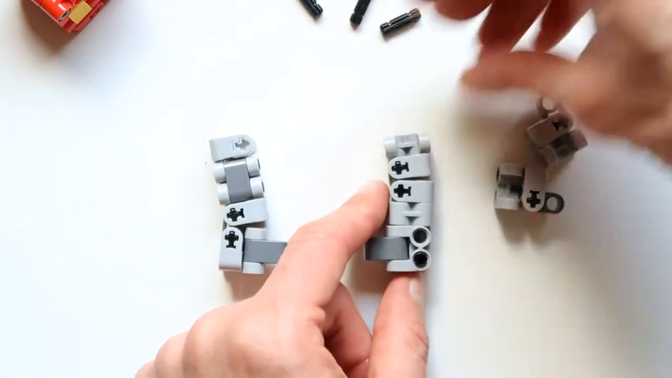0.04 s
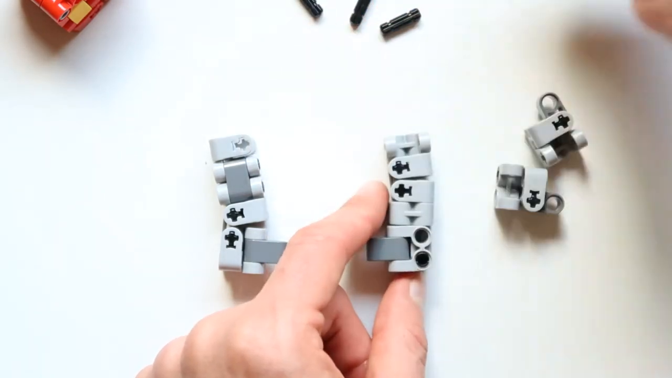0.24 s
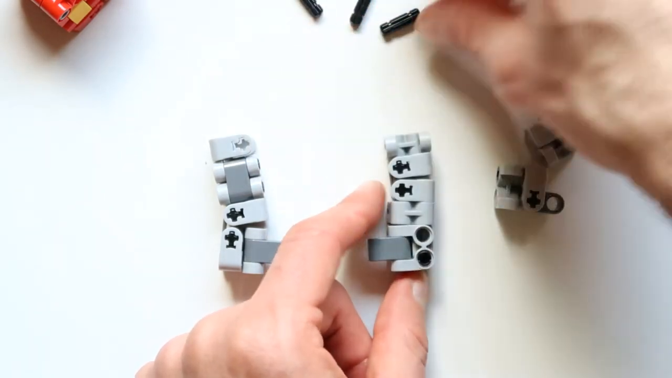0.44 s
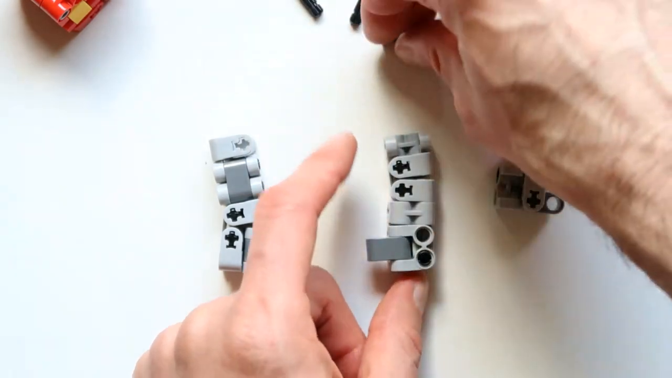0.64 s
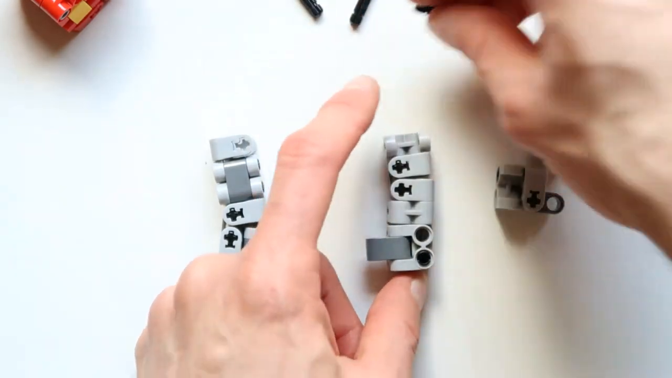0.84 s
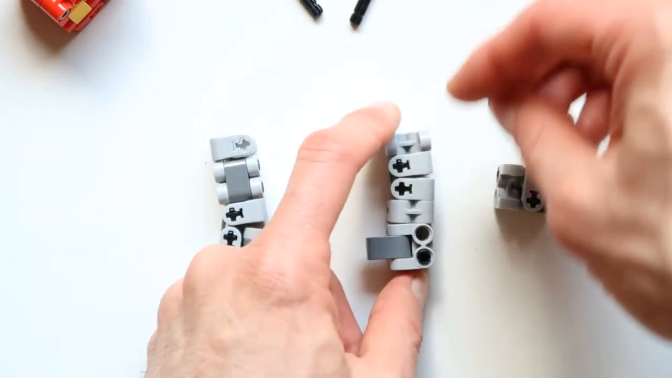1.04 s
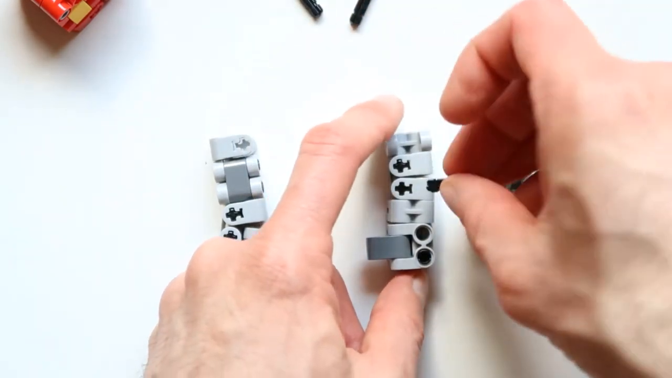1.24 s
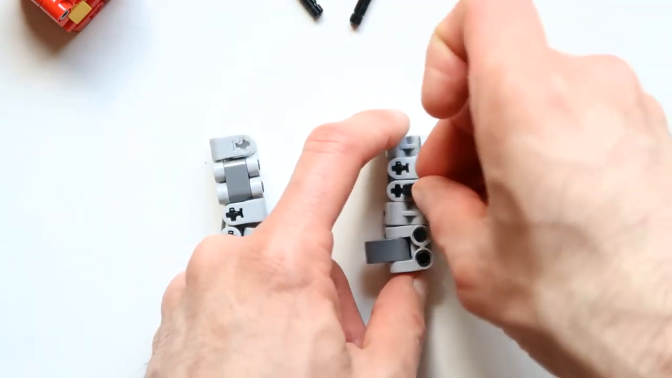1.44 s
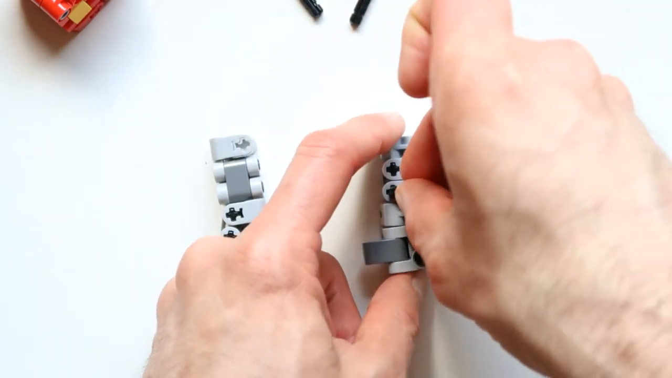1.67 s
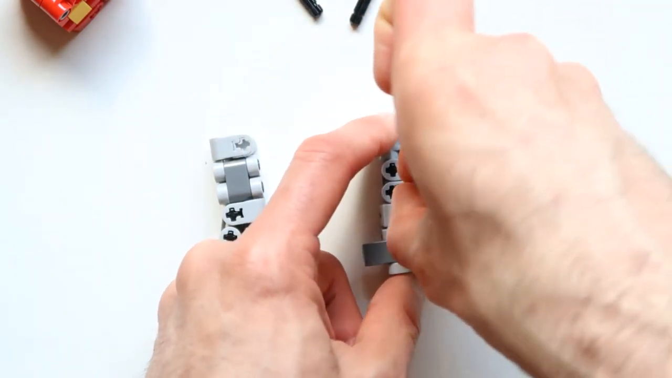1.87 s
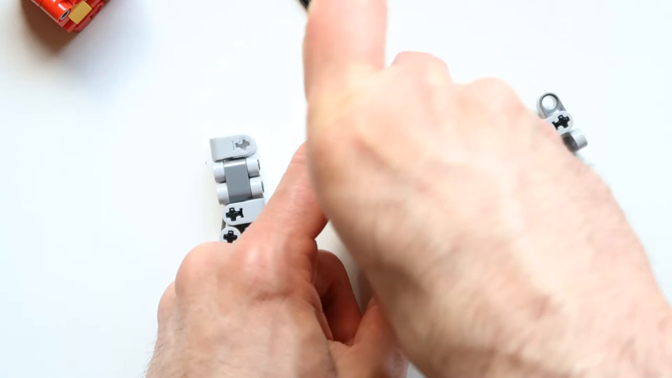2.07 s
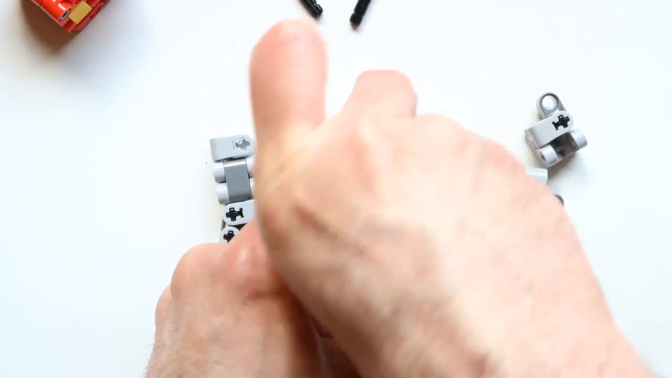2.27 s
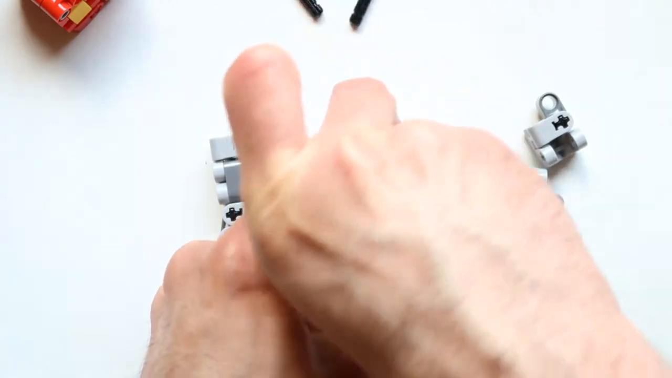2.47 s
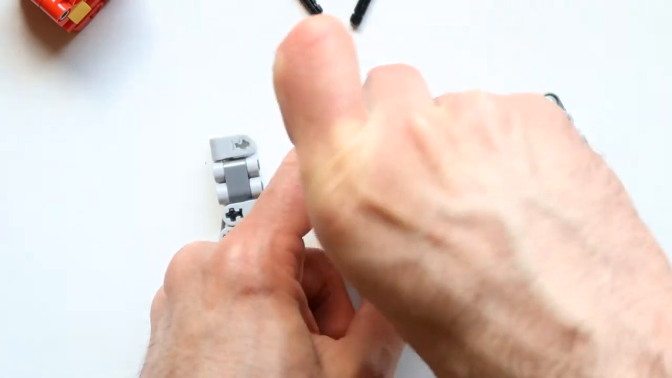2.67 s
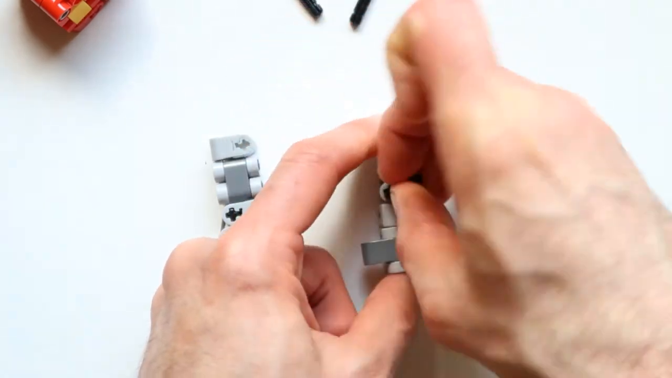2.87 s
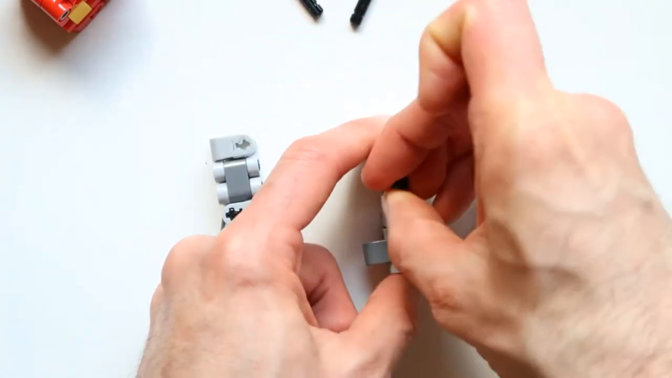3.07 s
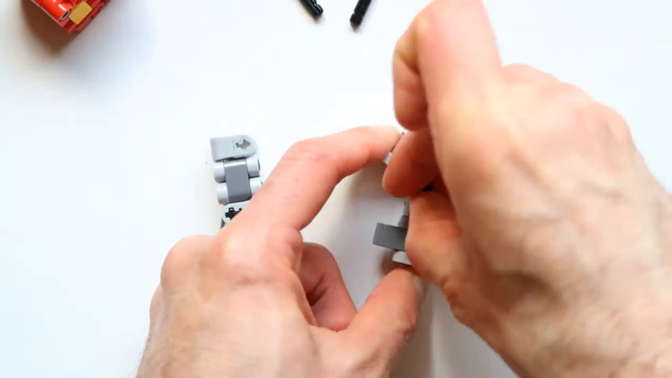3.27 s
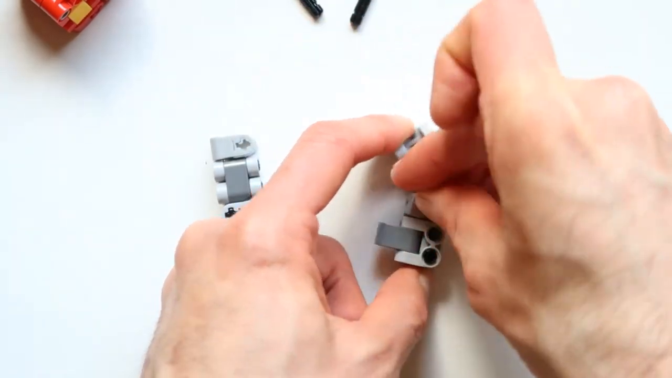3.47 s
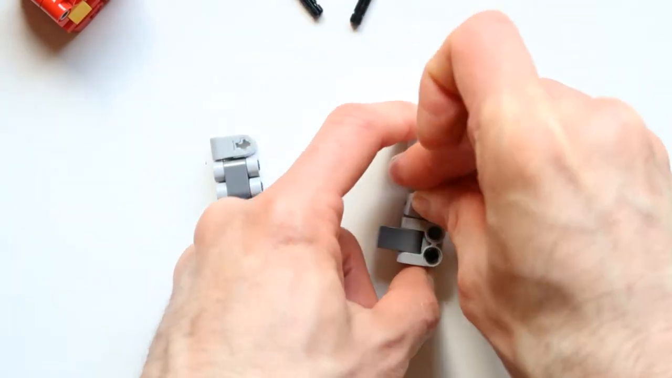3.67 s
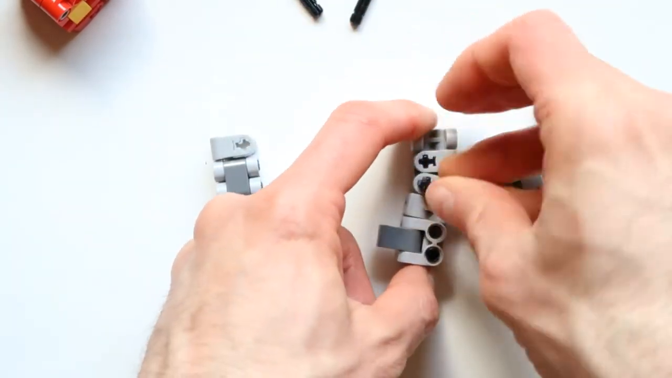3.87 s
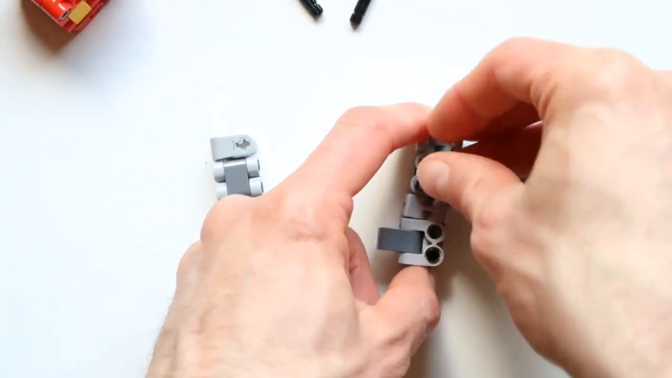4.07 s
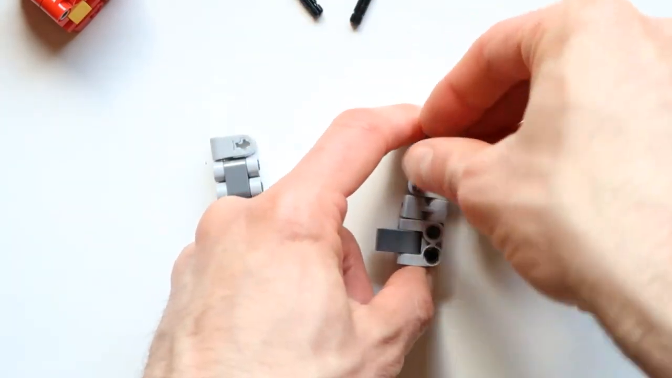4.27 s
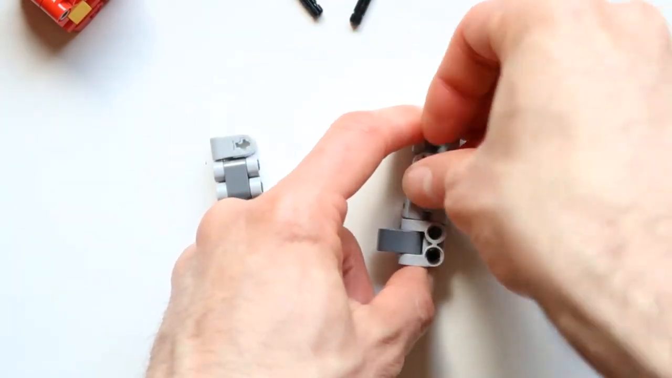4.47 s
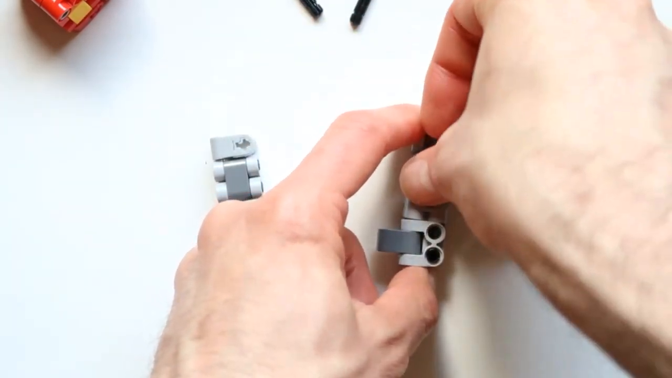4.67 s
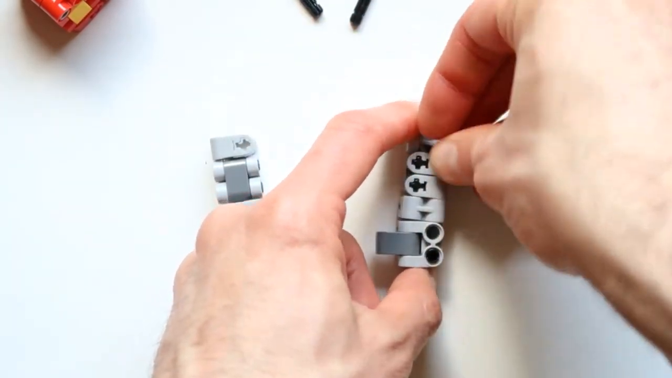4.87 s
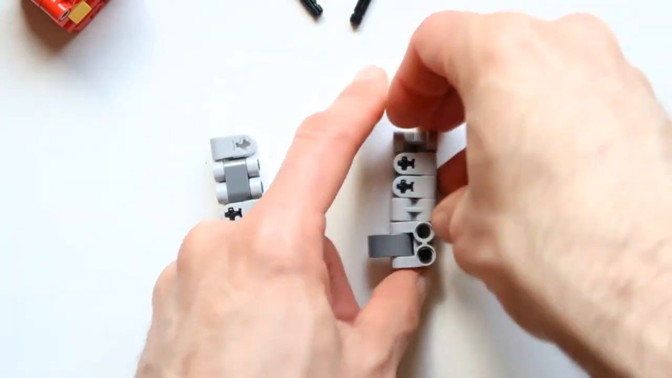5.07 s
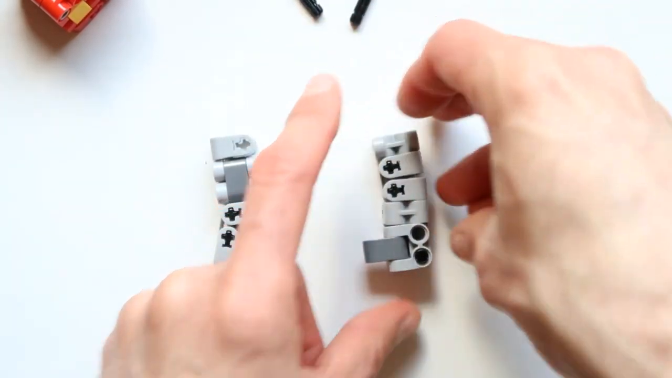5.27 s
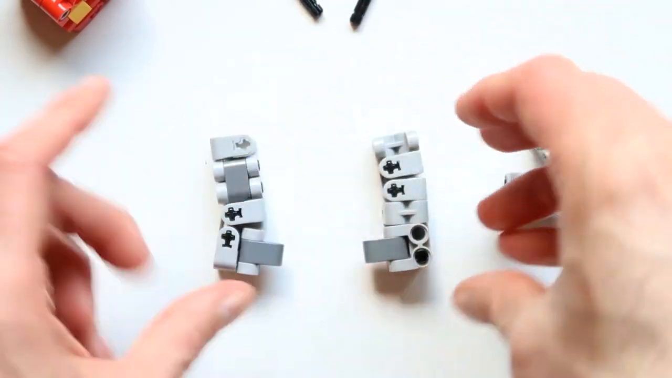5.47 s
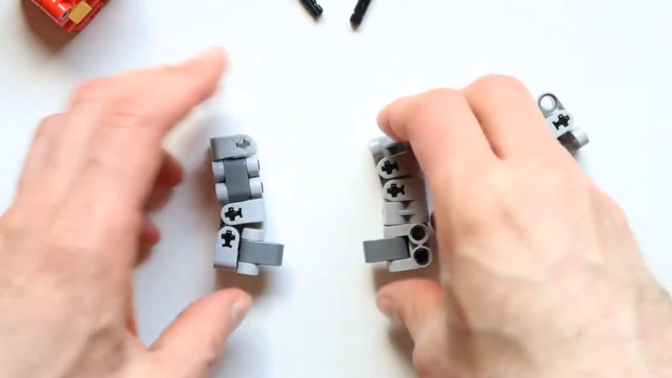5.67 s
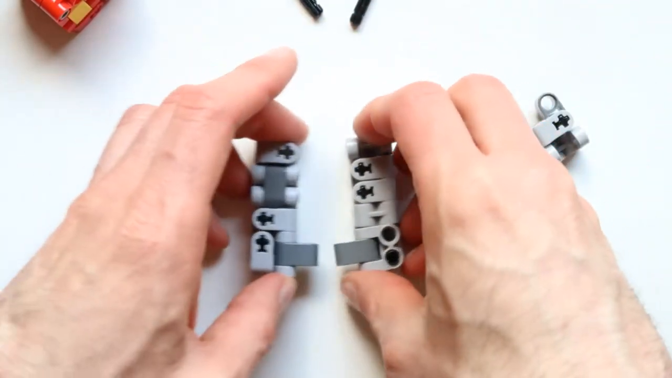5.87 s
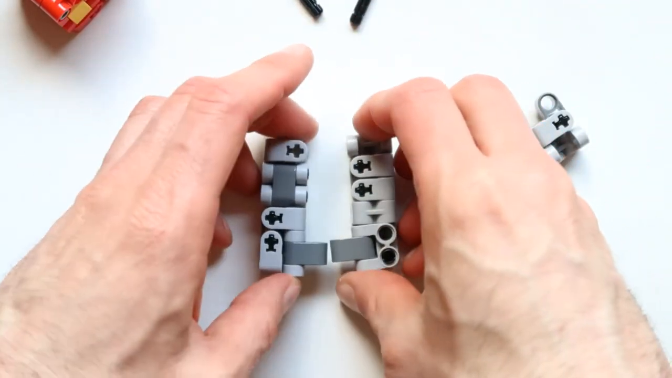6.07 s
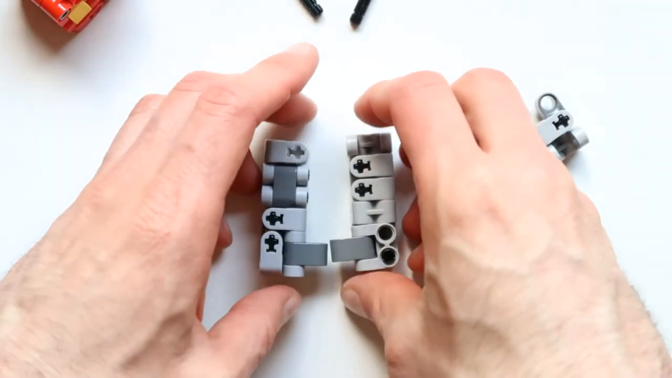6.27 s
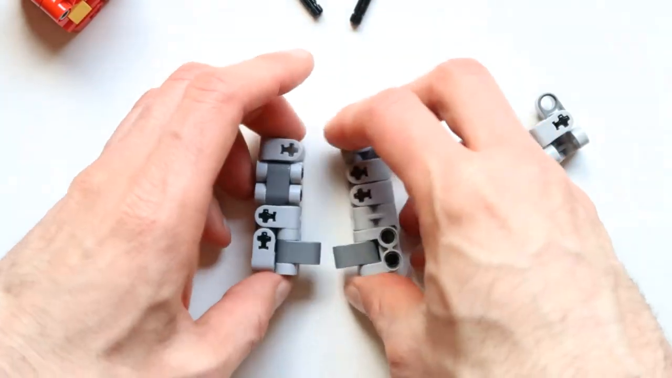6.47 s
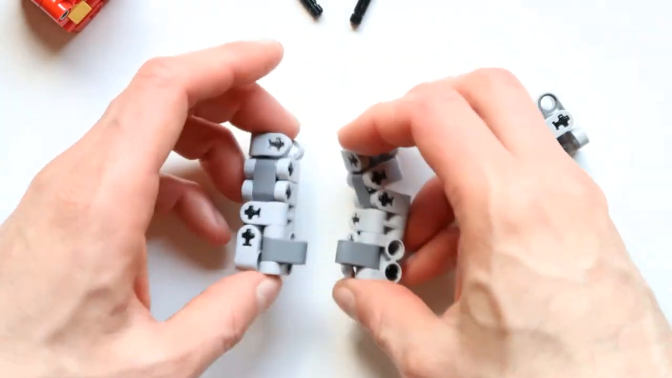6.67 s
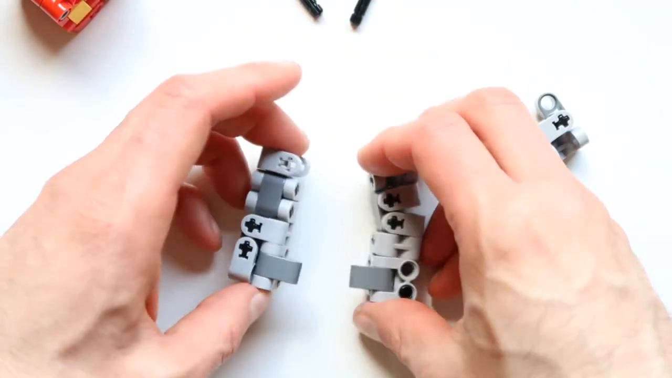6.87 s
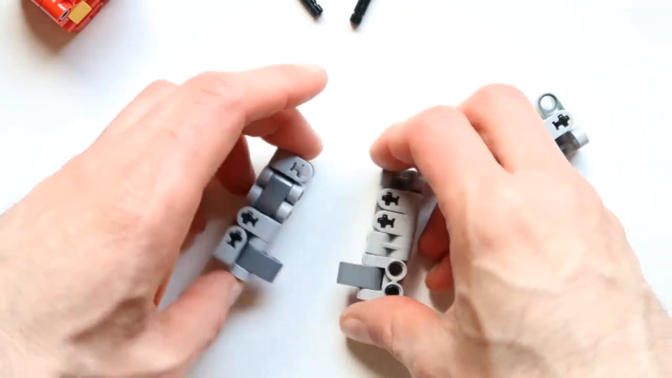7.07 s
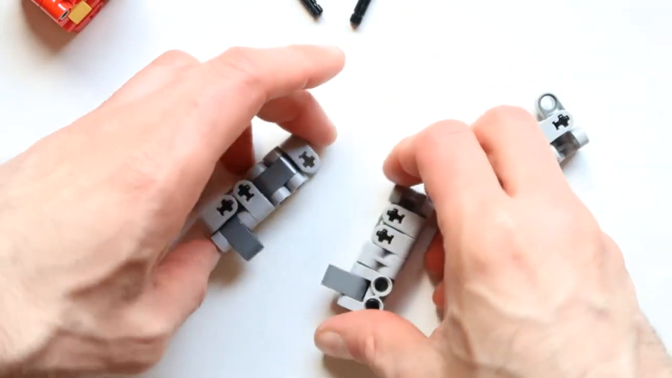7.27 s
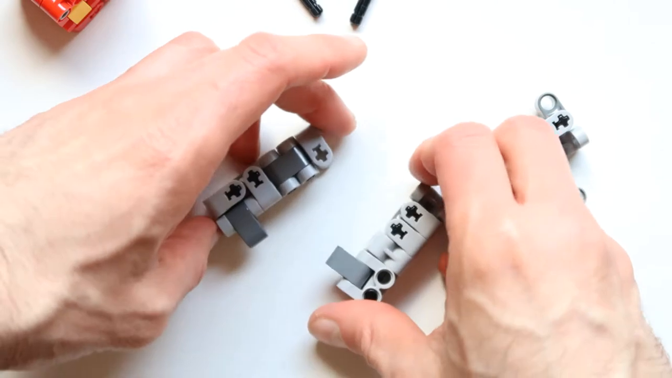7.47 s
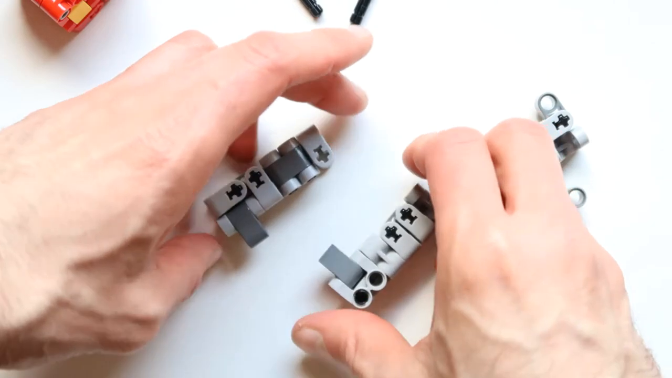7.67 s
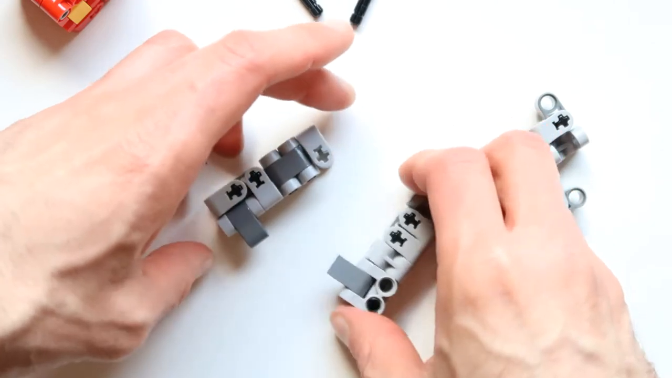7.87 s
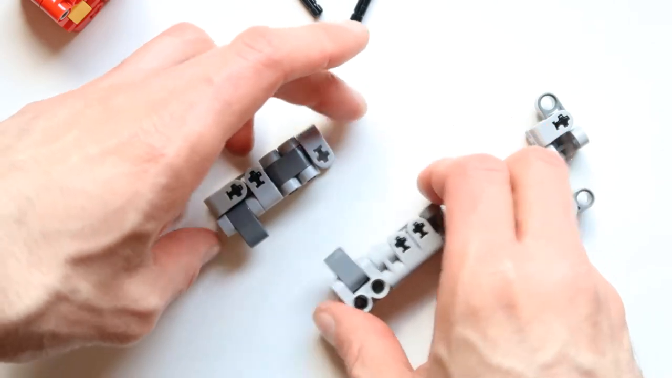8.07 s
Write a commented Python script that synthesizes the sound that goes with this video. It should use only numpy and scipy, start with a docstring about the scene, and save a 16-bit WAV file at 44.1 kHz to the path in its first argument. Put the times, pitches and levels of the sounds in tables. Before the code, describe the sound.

Small plastic building parts click, snap and scrape on a thin table as hands fit them together, over a faint low hum.

```python
"""A thin table top in a small room, under a close stereo microphone.
Hands press small plastic parts together and slide them about. Every touch and drag rings the same
table modes, while the plastic adds a broad knock and a bright tick. Some touches carry an extra
glint of treble or a brief ping, and a leaning hand bumps the table. The room answers with a short
tail, over a steady rumble with a few humming bands."""
import sys
import numpy as np
from scipy import signal
from scipy.fft import rfft, irfft, next_fast_len
from scipy.io import wavfile
from scipy.ndimage import uniform_filter1d

SR = 44100
rng = np.random.default_rng(int(sys.argv[2]) if len(sys.argv) > 2 else 0)


def to_wav(sig):
    """Store sig (one row per channel, or 1-D mono) as 16-bit WAV at the path in sys.argv[1].

    Samples outside -1..1 are clipped; the rate is SR.
    """
    pcm = np.clip(np.atleast_2d(sig), -1, 1) * 32767
    pcm = np.round(pcm).astype(np.int16)
    wavfile.write(sys.argv[1], SR, pcm.T)  # frames by channels


N = 358091

# Touches: start_s, level_db (mid-mode peak), then trims on it: low_db, hardness_db, tick_db
CONTACTS = [(0.6458, -58, 5, -3, -9), (0.697, -51, -9, -0.5, -10), (0.899, -57.5, -9, -1, -14),
            (1.3912, -41.5, -7, -7, -28), (1.429, -47.5, 9, 3.5, -18), (1.445, -49, 5, -5, -20),
            (1.4708, -58, -2, 12, -15), (1.487, -52, 13.5, 3, -22), (1.514, -50.5, 6.5, 3, -22),
            (1.586, -53, -1, -6, -24), (1.634, -53, -5, -2, -25), (1.717, -59, 7, 4, -18),
            (1.7674, -42.5, 3.5, -2, -31), (1.843, -52, 13.5, -5, -24), (1.9, -52, 9, 3, -14),
            (1.9288, -64, 26.5, -8, -14), (2.078, -46.5, 2, 4.5, -26), (2.0925, -33.5, 9.5, 6, -11),
            (2.1085, -49, 25, 5, -18), (2.6181, -9.5, 1, -4, -20), (2.772, -37.5, 4, -3, -20),
            (3.017, -47.5, -14, -1, -23), (3.026, -44, 1, -2, -12), (3.068, -58, 5, 0, -17),
            (3.1853, -27.5, -8, 3.5, -28), (3.287, -46.5, -9, 2, -20), (3.3189, -30, 12.5, 3, -33),
            (3.4278, -56, 11, 5, -4), (3.472, -54, 12, 0.5, -11), (3.533, -49.5, -1, 5, -19),
            (3.6229, -45, -1, -3, -25), (3.639, -32.5, 0.5, 3.5, -20.5), (3.818, -44, 3.5, -4.5, -21),
            (3.8836, -41, 4.5, 4.5, -26), (3.9146, -46, 8, 6, -17), (4.0613, -41, -2, -10, -32),
            (4.1716, -50, 2, -6, -24), (4.2526, -51, 1, 4.5, -20), (4.4243, -49.5, 17, -6, -28),
            (4.5011, -37.5, 7, -3, -27), (4.5121, -29, 6.5, -15, -33), (4.5569, -28.5, 5.5, 2, -17),
            (4.586, -40, -10, 6, -24), (4.6119, -19, 13, 1, -16.5), (4.6255, -33, -10, 1, -5.5),
            (4.652, -38, 4, -5, -12), (4.8251, -58, 22.5, 3, -17), (4.858, -42, 13.5, 2, -15),
            (4.916, -50, 16, -5, -17), (4.9464, -49, 16.5, 0, -18), (4.997, -47.5, 8, 0, -22),
            (5.026, -46, -15, -12, -30), (5.049, -35.5, -24, -30, -37), (5.1131, -40.5, 0.5, -4.5, -35),
            (5.2073, -29.5, 0.5, -1.5, -22), (5.2125, -30, -17, 7, -22), (5.218, -23.5, -17, 1.5, -24),
            (5.758, -37.5, -10, -12, -36), (5.81, -43, -11, 7, -10), (5.8346, -42, -8, -2, -3.5),
            (5.8564, -38, -7, -12, -23), (6.131, -55.5, 16.5, -4, -14), (6.269, -49.5, 6, -2, -17),
            (6.4909, -39, -14, -5, -13), (6.915, -18.5, -4, -3, -31.5), (6.9723, -37.5, 5.5, 5.5, -7.5),
            (7, -55.5, -15, 12.5, -22), (7.079, -55, -9, -2, 1), (7.135, -52.5, 11, -12, -21),
            (7.187, -52, 0, -6, -20), (7.198, -47.5, 7, -9, -23), (7.2485, -41.5, 4, 1.5, -17),
            (7.2678, -40, -9, 1, -23), (7.3244, -38.5, -20, 1, -34), (7.4105, -45, 6.5, -10, -27),
            (7.5574, -43, -3, 4, -21), (7.796, -55, -10, -12, -30), (7.856, -35, -5, -6, -16),
            (7.865, -38, -13, 2, -22), (7.8749, -37.5, -5, 1.5, -17), (7.904, -46, -10, -5, -28),
            (8.0184, -45.5, 3, -10, -30)]
# Drags: start_s, rise_s, hold_s, fall_s, drag_db, then trims on it: low_db, high_db, hiss_db
SLIDES = [(1.38, .012, 0.13, 0.044, -63.5, 14, 4, -24), (3.185, 0.011, 0.072, 0.14, -61, -15, 5, -11),
          (3.276, 0.035, 0.0074, 0.12, -51, 18, 3, -5.5), (3.86, 0.027, 0.036, 0.035, -48.5, 3.5, 6, -19),
          (4.495, 0.013, 0.037, 0.036, -40, 10, 4, -21), (4.543, 0.0094, 0.048, 0.018, -33, -11, 4, -27),
          (4.609, 0.015, 0.018, 0.096, -38.5, 7, -1, -19), (4.81, 0.039, 0.015, 0.059, -53, 10, 5, -14),
          (5.205, 0.0077, 0.017, 0.047, -34, -4, 3, -10.5), (5.8, 0.029, 0.025, 0.064, -37.5, -7, 3, -24),
          (5.881, 0.047, 0.041, 0.073, -46, 2, -7, -26), (6.46, 0.037, 0.012, 0.044, -39.5, -9, -3, -29),
          (6.936, 0.014, 0.035, .08, -68, 1, 3, 3), (7.241, 0.0073, 0.045, 0.046, -46, -2, -3, -25),
          (7.292, 0.024, 0.15, 0.057, -54, 2.5, -4, -29), (7.513, 0.041, 0.015, 0.089, -48.5, 5, -2, -30),
          (7.616, 0.018, 0.17, .05, -59.5, 7, -12, -30), (7.844, 0.018, 0.008, 0.076, -41.5, -3, -3, -16)]
# One-note accents: start_s, peak_db, pitch_hz, t60_s
BRIGHT_TICKS = [ (3.318, -33, 9800, 0.025), (3.317, -50, 14800, .025), (3.027, -45, 3930, 0.027),
                (3.185, -32.5, 3464, 0.036), (3.472, -49, 3580, .03), (3.82, -46, 3200, 0.034),
                (3.884, -48, 3620, .03), (3.916, -34.5, 3180, .028), (4.626, -42, 4930, .035),
                (5.21, -54, 4900, .05), (5.808, -54, 12500, .03), (5.815, -45, 13400, .025),
                (5.837, -54, 12400, .04), (6.969, -33, 8400, 0.019), (6.968, -38, 12900, .04),
                (7.08, -47, 8700, 0.023), (7.081, -44, 3980, .06), (7.248, -49, 12900, .04)]
RINGING_PINGS = [(3.318, -53, 9750, .22), (4.651, -29, 2680, .03), (4.997, -46, 1120, .07),
                 (5.172, -52, 2030, .1)]
HAND_BUMPS = [(4.608, -33, 48.2, 0.37), (4.877, -41, 48.8, 0.26)]
# The table top's modes, in five groups: pitch_hz, level_db, t60_s
LOW_MODES = [(303, -10.5, 0.063), (354.6, -7.5, 0.12), (419.4, -4.5, 0.062), (433.4, 0.5, 0.11),
             (660, -14, 0.079), (709.6, -9, 0.13)]
TOP_FLEX = (150, -19, 0.045)  # the whole top thuds along with the low group
LOW_MID_MODES = [(893, -9.5, 0.026), (994, -8, 0.035), (1113, 2, 0.086)]
MID_MODES = [(1420, -14, .04), (1502, 0, .085), (1568, -9, .04)]
HIGH_MID_MODES = [(1823, -11.5, 0.07), (1990, 6.5, 0.026), (2060, 3.5, 0.023)]
HIGH_MODES = [(2225, -8, 0.098), (2532, 7.5, 0.024), (2738, 0.5, 0.038), (2873, 5.5, 0.013),
              (3200, -7.5, 0.064), (3450, -9, 0.024), (3860, -21, 0.018), (4310, -8, 0.016)]
# Tone colours of the plastic's tick and knock, and of the room's rumble: frequency_hz, density_db
TICK_COLOUR = [(2060, -16), (3500, -4), (4680, -7), (6910, -9), (8680, -18.5), (9420, -8.5), (11000, -10.5),
               (13900, -21), (15800, -42)]
KNOCK_COLOUR = [(100, -13), (300, -1), (800, 5.5), (1500, -1), (2200, -2), (3000, -13.5), (4000, -17),
                (6000, -48)]
RUMBLE_COLOUR = [(22, -46), (33, -38), (39, -5.5), (60, -7), (101, -7.5), (187, -5.5), (326, -9),
                 (482, -10), (916, -17.5), (2060, -24.5), (3600, -28), (12000, -42), (13500, -47.5),
                 (15800, -58)]
# Phase between the microphone ports: frequency_hz, left_lead_rad
PORT_PHASE = [(0, 0), (2000, -.22), (4800, -.8), (5500, 2), (6200, .8), (7300, 1.5), (8400, -2.1),
              (15000, -1.7)]
# Balance between the ports: frequency_hz, left_over_right_db
PORT_BALANCE = [(600, 0), (1200, 1.5), (2400, .2), (5000, .7), (15000, 0)]
# Room decay: frequency_hz, t60_s
ROOM_DECAY = [(200, 0.28), (600, 0.21), (1500, 0.27), (4000, 0.26), (12000, 0.066)]
# Stereo image of the reflections and the rumble: frequency_hz, likeness (1 is mono, 0 is wide)
ECHO_LIKENESS = [(20, 1), (500, 1), (1500, 0.96), (4000, 0.58), (15000, 0)]
RUMBLE_LIKENESS = [(20, 1), (60, 0.98), (130, 1), (290, 0.81), (640, 0.76), (1410, 0.35), (3100, 0.067),
                   (15000, 0)]
# Humming bands in the rumble: pitch_hz, width_hz, boost_db
HUM_BANDS = [(40, 12.7, 8.5), (86.4, 3.5, 5), (135.5, 7.4, 12), (193.3, 12.2, 7), (369.6, 5.2, 9),
             (767, 22, 5.5), (1188.3, 4.9, 17.5)]

LET_GO_S = 5.78  # until here a hand pins the parts down and damps the low mids
CLEAN_RING_MS, FLUTTER_MS, FLUTTER_SHARE = 16, 5.5, 0.27
BOUNCES_PER_S, SLIPS_PER_S = 900, 3000
RUMBLE_DB, TOP_CUT_HZ = -47.5, 15900


def contact(start_s, level_db, low_db, hardness_db, tick_db):
    """A touch and a dying train of tiny bounces ring the table; the parts knock and spray treble."""
    force_db = level_db + 45  # over an ordinary touch
    low_mid_db = (-11.5 if start_s < LET_GO_S else -3.5) - 0.1 * force_db
    high_mid_db = hardness_db - 1
    high_db = hardness_db + 0.5 - 0.24 * force_db
    t = np.arange(4000) / SR
    loose = np.clip((-24.5 - level_db) / 11, 0.5, 1.8)  # a light touch chatters longer than a firm snap
    bounces = loose * np.exp(-t / (0.0045 * loose)) * rng.standard_normal(len(t))
    bounces *= rng.random(len(t)) < BOUNCES_PER_S / SR
    touch = t == 0
    table = 0
    for modes, gain_db, bounce_share, spot_db in (
            (LOW_MODES + [TOP_FLEX], low_db, 0.022, 1.5),  # bounces barely move the heavy low modes
            (LOW_MID_MODES, low_mid_db, 1.0, 2.5),
            (MID_MODES, 0, 0.23, 1.9),
            (HIGH_MID_MODES, high_mid_db, 0.4, 3.7),
            (HIGH_MODES, high_db, 0.25, 3.2)):
        ring = table_ring(modes, spot_db * loose, rise_ms=1.7 * loose, sustain=loose ** -0.3)
        table += amp(gain_db) * unit_peak(signal.fftconvolve(touch + bounce_share * bounces, ring))
    jolts = touch + 1.2 * abs(bounces)

    def burst(rise_s, fall_s):
        """An envelope that jumps at each jolt and dies away."""
        return unit_peak(signal.fftconvolve(jolts, np.exp(-t / fall_s) - np.exp(-t / rise_s))[:len(t)])

    knock = burst(0.00023, 0.0091) + 0.21 * burst(0.0055, 0.034)
    tick = burst(0.00021 * loose, 0.0027) + 0.097 * burst(0.0011, 0.055)  # a snap, then parts settle
    parts = amp(max(0, high_mid_db, high_db) - 17) * knock * noise(KNOCK_COLOUR, len(t))
    parts += amp(tick_db + 1.5) * tick * noise(TICK_COLOUR, len(t))
    return amp(level_db) * table, amp(level_db) * parts


def slide(start_s, rise_s, hold_s, fall_s, drag_db, low_db, high_db, hiss_db):
    """Dense, uneven stick-slip grit drives the table modes under a stroke; the parts rasp and hiss."""
    t = np.arange(0, rise_s + hold_s + fall_s, 1 / SR)
    stroke_db = np.interp(t, np.cumsum([0, rise_s, hold_s, fall_s]), [-15.5, 0, 0, -28.5])
    drag = amp(drag_db + stroke_db) * signal.windows.tukey(len(t), 0.2)
    slips = rng.standard_normal(len(t)) * amp(2.7 * rng.exponential(1, len(t)))
    slips *= rng.random(len(t)) < SLIPS_PER_S / SR

    def shake(modes):
        """The slips keep a group of modes ringing."""
        return unit_rms(signal.fftconvolve(slips, table_ring(modes, sustain=0.69))[:len(t)])

    bright_modes = [(hz, db + high_db, t60) for hz, db, t60 in HIGH_MID_MODES + HIGH_MODES]
    table = shake(MID_MODES + bright_modes)
    table += (0.75 if start_s < LET_GO_S else 0.95) * shake(LOW_MID_MODES)
    table += amp(low_db) * shake(LOW_MODES)
    grit = unit_rms(uniform_filter1d(abs(slips), 120))
    rasp = amp(-2) * noise(KNOCK_COLOUR, len(t))
    hiss = amp(hiss_db - 1) * noise(TICK_COLOUR, len(t))
    return amp(-4) * drag * table, drag * grit * (rasp + hiss)


def table_ring(modes, spot_db=2.5, rise_ms=0.73, sustain=1.0):
    """Modes swell as the bending wave spreads, ring clean for a moment, then scatter into a flutter."""
    hz, db, t60_s = np.transpose(modes)[..., None]
    ms = np.arange(3700) * 1000 / SR
    db = db + spot_db * rng.standard_normal(db.shape)  # the spot touched favours some modes
    decay_db = -60 * ms / (1000 * t60_s * sustain)
    detune = 0.0075 * np.maximum(1, (hz / 2100) ** 2)  # high modes shift most with the grip
    hz = hz * (1 + detune * rng.standard_normal(hz.shape))
    knots = rng.standard_normal((len(hz), 24))
    flutter = np.array([np.interp(ms / FLUTTER_MS, np.arange(len(row)), row) for row in knots])
    clean = np.exp(-(ms / CLEAN_RING_MS) ** 4)
    envelope = (1 - np.exp(-ms / rise_ms)) * (clean + FLUTTER_SHARE * (1 - clean) * flutter)
    return -(amp(db + decay_db) * envelope * np.sin(2 * np.pi * hz * ms / 1000)).sum(0)


def bright_tick(*note):
    """A short, narrow band of noisy treble that brightens a touch."""
    return rough_mode(*note, spread=0.16, rise_s=0.001, steady=0)


def ringing_ping(*note):
    """A brief, slightly rough ping on one clear note."""
    return rough_mode(*note, spread=0.042, rise_s=0.003, steady=1.8)


def hand_bump(*note):
    """A hand leans on the table: a soft, deep thump."""
    return rough_mode(*note, spread=0.042, rise_s=0.0034, steady=0.59)


def rough_mode(peak_db, pitch_hz, t60_s, spread, rise_s, steady):
    """One dying note whose level flickers; spread widens its band, steady adds pure tone."""
    t = np.arange(round(t60_s * SR)) / SR
    grain_samples = max(int(SR / (spread * pitch_hz)), 1)
    flicker = steady + 1.04 * unit_rms(uniform_filter1d(rng.standard_normal(len(t)), grain_samples))
    envelope = amp(-60 * t / t60_s) * (1 - np.exp(-t / rise_s))
    return amp(peak_db) * unit_peak(flicker * envelope * np.sin(2 * np.pi * pitch_hz * t))


def microphone_ports(direct):
    """Two ports a little apart hear each frequency with their own phase and level."""
    size = next_fast_len(N + 4096)
    hz = np.fft.rfftfreq(size, 1 / SR)
    left = amp(curve(PORT_BALANCE, hz) / 2) * np.exp(0.5j * curve(PORT_PHASE, hz))
    return irfft(rfft(direct, size) * np.array([left, 1 / left]), size)[:, :N]


def room_reflections(send):
    """Sparse reflections, each band dying at its own speed, centred in the bass and wide on top."""
    taps = np.zeros((2, SR // 2))
    slots = np.arange(260, SR // 2 - 20, 20)
    arrivals = slots + rng.integers(0, 20, (2, len(slots)))
    np.put_along_axis(taps, arrivals, rng.choice([-1., 1.], arrivals.shape), 1)
    hz, t, spectra = signal.stft(taps, SR, nperseg=256)
    decay = amp(-60 * t / curve(ROOM_DECAY, hz)[:, None])
    tail = signal.istft(stereo_pair(*spectra, ECHO_LIKENESS, hz) * decay, SR, nperseg=256)[1]
    return signal.fftconvolve(send[None], tail / np.linalg.norm(tail[0]), axes=1)[:, :N]


def room_rumble():
    """A steady bed of low noise with narrow humming bands and faint drifting patches."""
    frames, hz = N // 1024 + 5, np.fft.rfftfreq(4096, 1 / SR)
    left_re, left_im, other_re, other_im, drift = rng.standard_normal((frames, 2049, 5)).T
    drift_db = 1.42 * unit_rms(uniform_filter1d(uniform_filter1d(drift, 40, 0), 4, 1))
    hum_db = sum(db * np.exp(-0.5 * ((hz - pitch) / width) ** 2) for pitch, width, db in HUM_BANDS)
    spectra = stereo_pair(left_re + 1j * left_im, other_re + 1j * other_im, RUMBLE_LIKENESS, hz)
    spectra *= amp((curve(RUMBLE_COLOUR, hz) + hum_db)[:, None] + drift_db)
    return amp(RUMBLE_DB) * unit_rms(signal.istft(spectra, nperseg=4096, noverlap=3072)[1][:, :N])


def stereo_pair(left, other, likeness, hz):
    """The right side blends the left spectrum with an unrelated one."""
    shared = np.clip(curve(likeness, hz), -1, 1)[:, None]
    return np.array([left, shared * left + np.sqrt(1 - shared ** 2) * other])


def noise(colour, size):
    """Noise with a given tone colour, at rms 1."""
    hz = np.fft.rfftfreq(size, 1 / SR)
    return unit_rms(irfft(rfft(rng.standard_normal(size)) * amp(curve(colour, hz)), size))


def curve(points, hz):
    """Joins a table's points on a log-frequency axis."""
    point_hz, values = np.transpose(points)
    return np.interp(np.log(hz + 1), np.log(point_hz + 1), values)


def amp(db):
    """Decibels to gain."""
    return 10 ** (np.asarray(db) / 20)


def unit_rms(x):
    """Scaled to rms 1."""
    return x / np.sqrt(np.mean(x ** 2) + 1e-20)


def unit_peak(x):
    """Scaled to peak 1."""
    return x / (abs(x).max() + 1e-20)


def add(bus, start_s, sound):
    """Lays a sound onto a bus."""
    span = bus[round(start_s * SR):][:len(sound)]
    span += sound[:len(span)]


def scene():
    """A table bus and a plastic bus, heard close up and through the room, over the rumble."""
    table, parts = np.zeros((2, N))
    events = [(row[0] - 0.0006, contact(*row)) for row in CONTACTS]
    events += [(row[0], slide(*row)) for row in SLIDES]
    for start_s, (ring, plastic) in events:
        add(table, start_s, ring)
        add(parts, start_s, plastic)
    for start_s, *note in HAND_BUMPS:
        add(table, start_s, hand_bump(*note))
    for start_s, *note in RINGING_PINGS:
        add(table, start_s, ringing_ping(*note))
    for start_s, *note in BRIGHT_TICKS:
        add(parts, start_s, bright_tick(*note))
    send = amp(-16) * table + amp(-8.5) * parts  # knocks radiate; the table rings mostly into the stand
    return microphone_ports(table + parts) + room_reflections(send) + room_rumble()


def record(dry):
    """A steep low-pass trims the very top of the treble."""
    low_pass = signal.firwin(511, TOP_CUT_HZ, window=("kaiser", 9), fs=SR)
    return signal.oaconvolve(dry, low_pass[None], "same")


dry = scene()
out = record(dry)
to_wav(out)
```